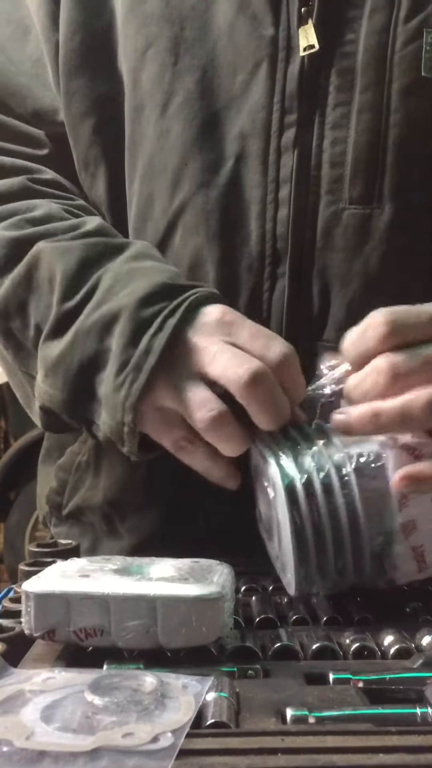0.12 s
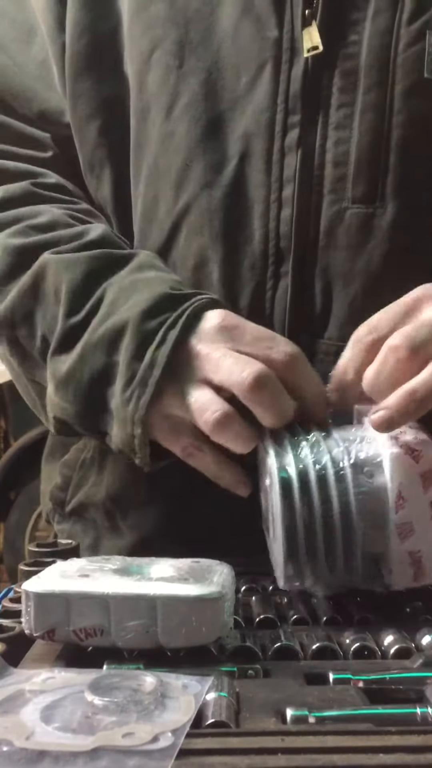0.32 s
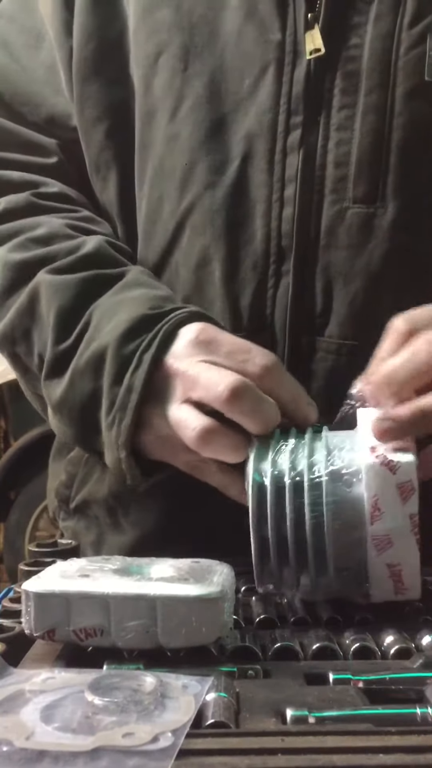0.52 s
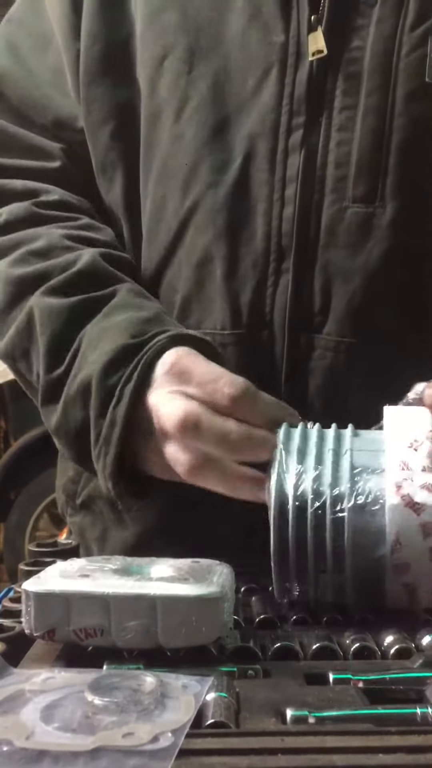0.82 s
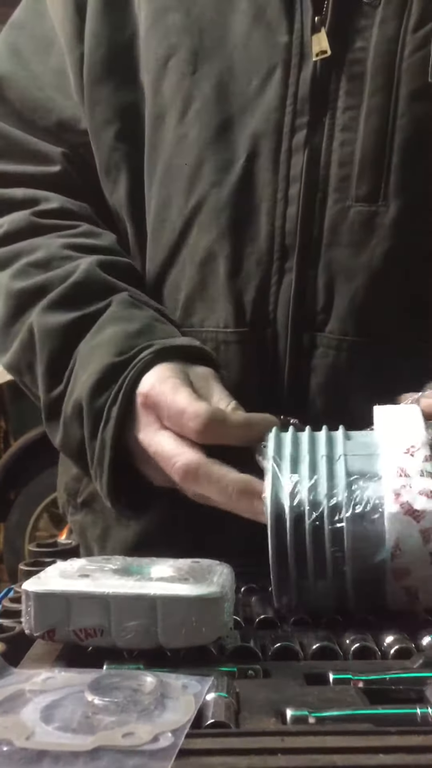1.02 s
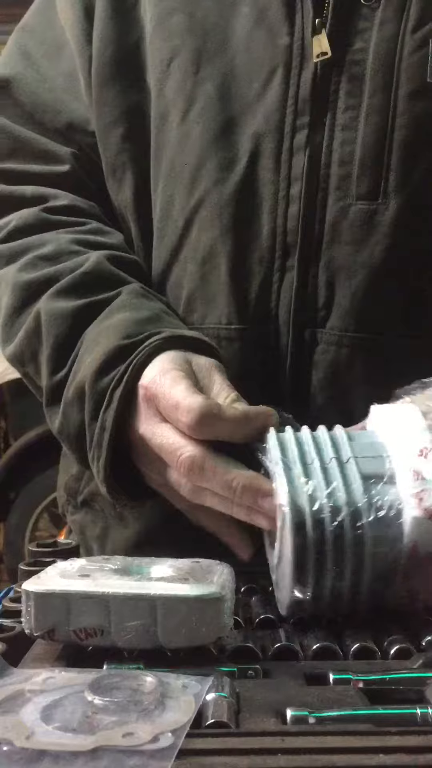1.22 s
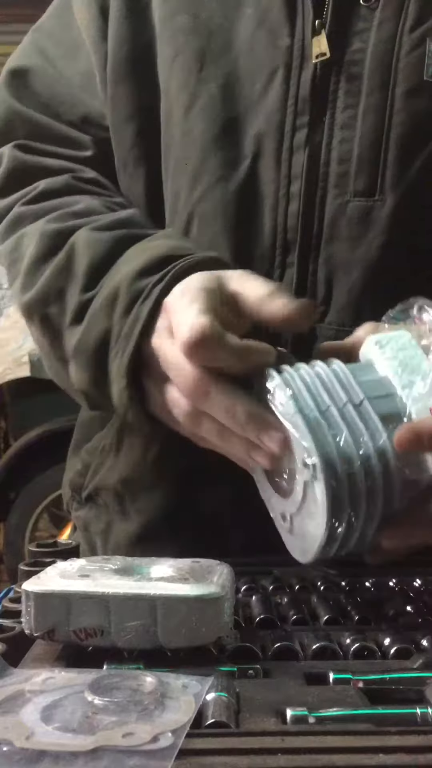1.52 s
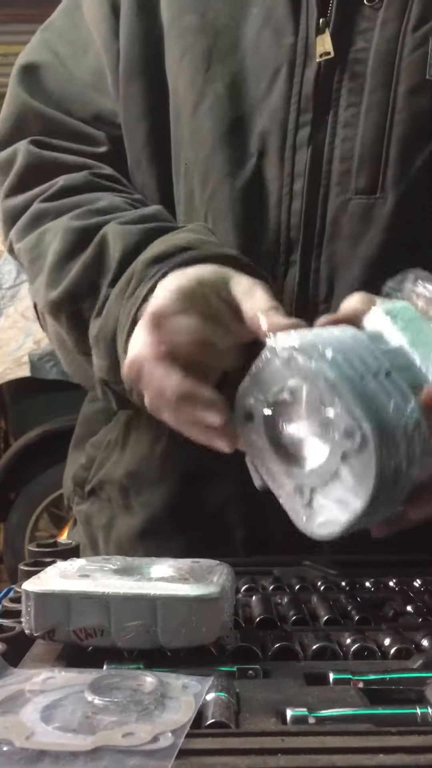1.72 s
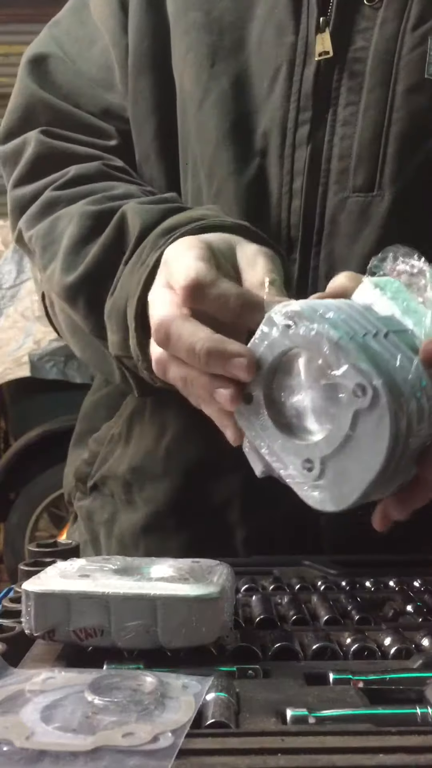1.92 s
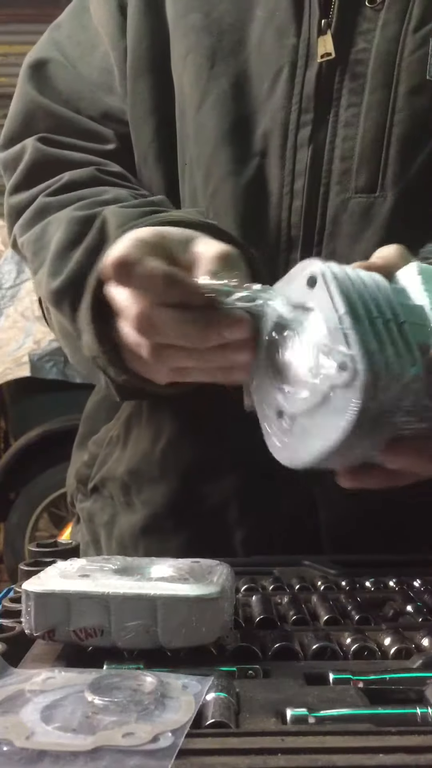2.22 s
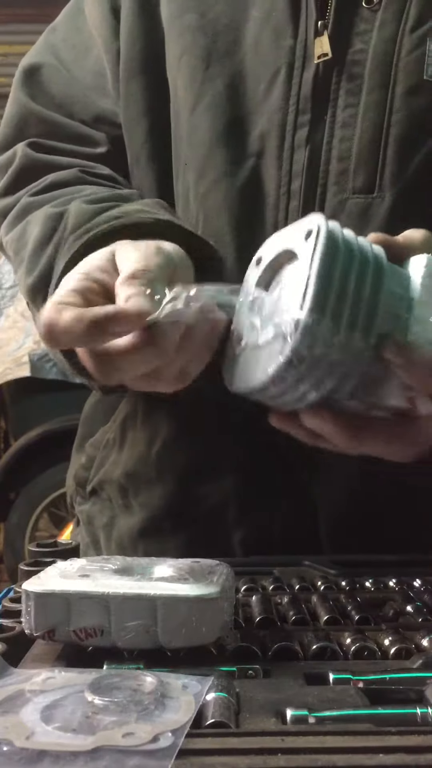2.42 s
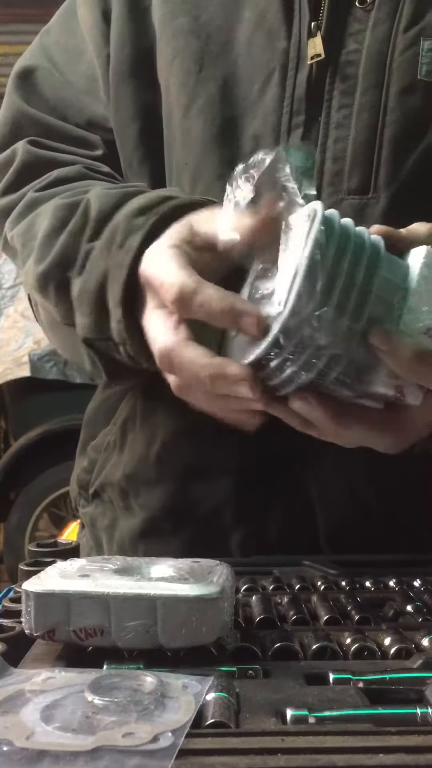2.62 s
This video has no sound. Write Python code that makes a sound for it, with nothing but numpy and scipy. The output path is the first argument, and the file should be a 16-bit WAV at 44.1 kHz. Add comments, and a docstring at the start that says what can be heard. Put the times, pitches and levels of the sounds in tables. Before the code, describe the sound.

Thin plastic wrap crackles and rustles close to the microphone as hands peel it from a metal part; sharp snaps come early, dull knocks hit the bench, then brisk crinkling follows over faint hum.

```python
"""Peeling plastic wrap off a finned metal part

Hands peel clear plastic wrap off a finned metal part at a workbench, close to the microphone.
The film snaps (noise bursts and short tones) and rustles (many tiny ringing creases over hiss), and
this makes the metal fins ring a little. Four dull knocks shake the bench with noise and fading tones.
A sleeve swishes as the hand pulls away, fingers rub softly, and a faint hum fills the small workshop."""
import sys
import numpy as np
from scipy import signal
from scipy.fft import rfft, irfft, next_fast_len
from scipy.io import wavfile
from scipy.ndimage import map_coordinates

SR = 44100
rng = np.random.default_rng(int(sys.argv[2]) if len(sys.argv) > 2 else 0)


def unload_audio(sound):
    """Save the sound as a 16-bit wav file, at the path given as the first command line argument."""
    columns = np.transpose(np.atleast_2d(sound))
    # keep every value between -1 and 1, then stretch to whole-number steps
    steps = np.round(np.clip(columns, -1, 1) * 32767)
    wavfile.write(sys.argv[1], SR, steps.astype(np.int16))


N = 123480  # length in samples
TOP_HZ = 16300  # highest pitch that the recorder keeps

# Colour of the crackling film. Each row: frequency in Hz, relative level in dB.
FILM_COLOUR = [(100, -54), (600, -26.5), (1800, -2.5), (2500, -6.5), (3400, 2), (4700, 0.5), (6500, 0),
               (9000, -2.5), (12000, -6), (16000, -10)]
# Colour of the hollow wrap between the hands. Each row: frequency in Hz, relative level in dB.
WRAP_COLOUR = [(80, -33.5), (220, -11.5), (350, -7), (520, -15.5), (720, -9.5), (950, 4), (1170, 0.5),
               (1380, 4), (1750, -10.5), (2500, -13), (4000, -35.5), (12000, -61)]


def amp(db):
    """Turn decibels into a gain."""
    return 10 ** (np.asarray(db) / 20)


def unit(x):
    """Scale a sound to an rms (average strength) of 1."""
    return x / np.sqrt(np.mean(x ** 2) + 1e-20)


def along(points, hz):
    """Read a curve of (Hz, value) points on a logarithmic frequency axis."""
    f, v = np.transpose(points)
    return np.interp(np.log(hz + 1), np.log(f + 1), v)


def level(points):
    """Turn (seconds, dB) points into a gain for every sample."""
    return amp(np.interp(np.arange(N) / SR, *np.transpose(points)))


def wobble(rate):
    """Draw a smooth random curve through `rate` random points a second."""
    points = rng.standard_normal(N // 8)
    return map_coordinates(points, [np.arange(N) * rate / SR], mode="wrap")


def colour(x, points):
    """Filter a sound with the given spectrum, without ringing ahead of time (minimum phase)."""
    size = 8192
    log_gain = np.log(amp(along(points, np.fft.rfftfreq(size, 1 / SR))))
    cepstrum = irfft(log_gain)
    # Folding the second half onto the first makes the filter answer at once.
    cepstrum[1:size // 2] *= 2
    cepstrum[size // 2 + 1:] = 0
    response = irfft(np.exp(rfft(cepstrum)))
    return signal.fftconvolve(x, response / np.linalg.norm(response))[:len(x)]


def noise(points):
    """Make coloured noise of rms 1, as long as the scene."""
    return unit(colour(rng.standard_normal(N), points))


def add(track, s, sound):
    """Mix a sound into the track at time s in seconds."""
    part = track[max(0, round(s * SR)):][:len(sound)]
    part += sound[:len(part)]


def burst(envelope, points, vary_db):
    """Make a noise burst of unit energy, its colour varied at random each time."""
    hz = np.geomspace(100, 16000, 48)
    own_db = along(points, hz) + vary_db * rng.standard_normal(len(hz))
    x = colour(envelope * rng.standard_normal(len(envelope)), np.c_[hz, own_db])
    return x / np.linalg.norm(x)


def snaps():
    """A crease creaks, flips with a crack, rings at its own pitch and thumps the hollow wrap."""
    # Single creases snapping. Each row: start in seconds, relative crack level in dB,
    # relative hollow body level in dB, pitch of the crease in Hz, its ring against the crack in dB.
    snap_rows = [(0.16, -27, -35.5, 5100, -1), (0.2386, -20, -24.5, 3150, -16),
                 (0.2847, -16.5, -22.5, 3580, 4.5), (0.335, -17, -32.5, 5400, -7),
                 (0.3448, -23, -47, 3400, -17), (0.407, -21, -63, 4960, -7),
                 (0.417, -24.5, -37.5, 4460, -4), (0.4456, -15.5, -31, 2900, -5),
                 (0.5441, -15.5, -37, 5900, -11), (0.5484, -17.5, -53, 3270, -3),
                 (0.5619, -14, -26.5, 6700, -2), (0.5749, -21, -30, 4380, -23),
                 (0.5914, -11, -24.5, 3610, -6.5), (0.5974, -23.5, -35, 6970, 3),
                 (0.618, -31, -38.5, 5450, 1), (0.7129, 1.5, -14.5, 3340, -1.5),
                 (0.7172, -20, -27, 3490, 6), (0.7398, -5.5, -16, 4100, -13), (0.7544, -18, -45, 6560, 3),
                 (0.76, -12, -35, 3780, -5), (0.7737, -10.5, -33, 6890, -5),
                 (0.779, -11.5, -15.5, 7150, 1.5), (0.7811, -5.5, -23, 6200, -4),
                 (0.8107, -10.5, -21.5, 4350, -4), (0.8659, -25.5, -55, 11440, -2),
                 (0.924, -19.5, -37.5, 4440, -2), (0.9307, -19, -34, 3800, -23),
                 (0.9683, -19, -37, 6700, -2), (0.9754, -18.5, -23.5, 3000, -20),
                 (1.0578, -21.5, -40, 4460, -12), (1.0877, -24, -32, 3040, -4),
                 (1.0984, -24, -31.5, 3120, 1), (1.1193, -16, -35, 7360, -1), (1.127, -21, -44, 6590, 4),
                 (1.1578, -14.5, -35, 5560, -9), (1.177, -18, -36, 3000, -7),
                 (1.1817, -12.5, -36.5, 5760, -1), (1.1944, -22.5, -46, 5700, 3),
                 (1.2304, -29, -47, 4270, -3), (1.292, -25, -40, 3950, -18),
                 (1.314, -20.5, -36.5, 4360, -10), (1.3281, -22.5, -41, 6800, 2),
                 (1.3465, -15, -34, 3640, 3), (1.4167, -20, -56, 5230, -16), (1.5685, -27, -68, 5760, 0),
                 (1.5861, -23, -35, 9000, -7), (1.6115, -20, -62, 3650, -1),
                 (1.6796, -23.5, -54, 3920, 2.5), (1.8118, -23.5, -63, 4060, -2.5),
                 (1.8297, -45, -68, 5000, 16), (1.8564, -33.5, -42.5, 3520, 9.5),
                 (1.9136, -16.5, -40, 3430, -11), (1.9394, -30.5, -69, 3960, -2),
                 (1.9994, -25.5, -49, 3520, -13), (2.0909, -25.5, -40, 3540, -14),
                 (2.1079, -15.5, -66, 3400, -14), (2.138, -8.5, -28.5, 6450, -4),
                 (2.1583, -14.5, -42, 4300, -12), (2.1814, -19, -37, 3380, 3), (2.2972, -20, -38, 4200, -5),
                 (2.3291, -18.5, -31, 3220, -1), (2.3644, -13.5, -36.5, 3530, -23),
                 (2.3735, -12, -42, 3180, -6.5), (2.4088, -14, -33, 4060, 0), (2.4204, -16, -35, 3760, -15),
                 (2.4793, -28, -55, 3540, -20), (2.496, -29.5, -48, 9000, 7),
                 (2.5263, -25.5, -36.5, 9340, 2.5), (2.6709, -26.5, -41.5, 3720, -13),
                 (2.717, -19.5, -40.5, 5670, -3), (2.7258, -19.5, -67, 3500, -3),
                 (2.749, -18.5, -60, 3500, -19), (2.7599, -18, -44, 3500, -5)]
    crack_gain_db, crack_rise_s = 6, 0.00049  # rise time of a crack whose row says 0 dB
    weak_slower = 0.38  # weak creases flip more slowly: dB of duration per dB of strength
    flutter_db, flutter_s = -5, 0.006  # the flutter after the crack: level, fading time
    crease_gain_db, crease_s = 5.5, 0.0012  # ring of a crease: level, fading time
    crease_blur = 0.26  # random phase step per sample in radians
    body_gain_db, body_rise_s = 19.5, 0.0009  # the wrap's answer
    lead_db, lead_s = -5, 0.0015  # creak just before the crease gives way: level, swell time

    out = np.zeros(N)
    t = np.arange(SR // 20) / SR
    for s, crack_db, body_db, hz, ring_db in snap_rows:
        u = t / (crack_rise_s * amp(-weak_slower * crack_db))
        growth = 1 - np.exp(-u)
        flip = u * np.exp(1 - u)
        flutter = amp(flutter_db) * growth * np.exp(-t / flutter_s)
        crack = burst(flip + flutter, FILM_COLOUR, vary_db=4.5)

        blur = crease_blur * np.cumsum(rng.standard_normal(len(t)))
        ring = growth * np.exp(-t / crease_s) * np.sin(2 * np.pi * hz * t + blur)
        ring /= np.linalg.norm(ring)
        body = burst(t / body_rise_s * np.exp(-t / body_rise_s), WRAP_COLOUR, vary_db=1.2)

        flip_sound = amp(crack_gain_db) * crack + amp(crease_gain_db + ring_db) * ring
        add(out, s, amp(crack_db) * flip_sound)
        add(out, s, amp(body_db + body_gain_db) * body)

        # Played backwards, the fading burst swells up to the snap.
        lead = amp(crack_db + lead_db) * burst(np.exp(-t / lead_s), FILM_COLOUR, vary_db=1.5)
        add(out, s - len(t) / SR, lead[::-1])
    return out


def rustle():
    """Clumps of tiny creases, each with its own pitch, over the hiss of film sliding on film."""
    # How hard the film is worked. Each row: time in seconds, crackle level in dB,
    # hollow body level in dB, both ahead of the clumping and the mix of creases and hiss.
    effort = [(0, -62, -53.5), (0.118, -62.5, -58.5), (0.163, -44, -44), (.24, -44.5, -40),
              (.31, -53.5, -55.5), (.42, -52, -47), (.47, -46.5, -40), (0.526, -57, -61), (.55, -47, -42.5),
              (.585, -38.5, -35.5), (.63, -52.5, -57), (0.666, -52.5, -41.5), (.70, -47, -55.5),
              (.775, -47, -40), (.84, -47.5, -47), (0.898, -54.5, -55), (0.942, -43, -44.5),
              (1.02, -47, -41.5), (1.125, -42.5, -41), (1.17, -58, -49), (1.215, -60, -58),
              (1.33, -51, -43.5), (1.48, -42.5, -47), (1.55, -54, -55), (1.61, -42.5, -48.5),
              (1.66, -55, -58.5), (1.79, -54, -56), (1.87, -56.5, -53), (1.97, -58, -63),
              (2.07, -58.5, -68), (2.14, -40.5, -41.5), (2.19, -37, -47), (2.225, -48, -52.5),
              (2.261, -42, -43.5), (2.36, -36.5, -48), (2.418, -49.5, -43), (2.45, -53, -71),
              (2.54, -51, -47.5), (2.655, -64, -65), (2.685, -49, -51.5), (2.765, -39, -52.5),
              (2.8, -54, -54)]
    crinkles_per_s = 1600
    spread_db, size_cap = 7, 2.2  # spread of crease strengths, and a cap on the random size
    middle_hz, octaves, cycles = 5720, 1.475, 2.5  # crease pitch, its range each way, fading time
    slide_db = -2.5  # sliding hiss against the tiny creases
    clump_db, clumps_per_s = 2, 90

    crinkles = np.zeros(N)
    t = np.arange(SR // 150) / SR
    slide = amp(slide_db) * rng.standard_normal(N)
    for when, size, pitch in rng.random((int(crinkles_per_s * N / SR), 3)):
        hz = min(middle_hz * 2 ** (octaves * (2 * pitch - 1)), TOP_HZ - 1000)
        size_db = spread_db * min(-np.log(1 - size), size_cap)
        tone = np.exp(-t * hz / cycles) * np.sin(2 * np.pi * hz * t)
        add(crinkles, when * N / SR, amp(size_db) * hz * tone)

    def through(points):
        """Colour creases and hiss alike and mix them to rms 1."""
        return unit(unit(colour(crinkles, points)) + colour(slide, points))

    s, crackle_db, body_db = np.transpose(effort)
    clumps = unit(amp(clump_db * wobble(clumps_per_s)))
    crackle = level(np.c_[s, crackle_db]) * through(FILM_COLOUR)
    body = level(np.c_[s, body_db]) * through(WRAP_COLOUR)
    return clumps * (crackle + body)


def fins(film):
    """The metal fins ring briefly with the film, damped by the hands."""
    # Ring of the cooling fins. Each row: pitch in Hz, relative level in dB.
    fin_tones = [(2381, -3), (2599, 5), (3138, -15), (3330, -10.5), (3473, -3.5), (3663, 4.5), (4068, -13),
                 (4385, -1)]
    # The fins ring more freely once the part is lifted.
    # Each row: time in seconds, level of the film's push on the fins in dB.
    fin_freedom = [(0, -19.5), (1.4, -20.5), (1.8, -12), (2.8, -13)]
    t60_s = 0.04  # time to fade by 60 dB

    t = np.arange(SR // 8) / SR
    ring = sum(amp(db - 60 * t / t60_s) * np.sin(2 * np.pi * hz * t) for hz, db in fin_tones)
    return signal.fftconvolve(level(fin_freedom) * film, ring / np.linalg.norm(ring))[:N]


def knocks():
    """A dull contact and short rattle, a sagging thud, then the bench booms and rings."""
    # Dull knocks on the bench. Each row: start in seconds, contact level in dB,
    # level of thud, boom and ring together in dB (relative), starting pitch of the thud in Hz.
    knock_rows = [(0.2121, -18.5, -25.5, 275.3), (0.4519, -15, -23, 263.3), (.997, -22, -27, 268),
                  (1.3563, -20.5, -25, 306.7)]
    # Colour of the contact. Each row: frequency in Hz, relative level in dB.
    contact_colour = [(100, -8.5), (500, -9), (800, -7), (1050, 3.5), (1400, 0), (2000, -6.5), (2500, -11),
                      (3200, -7), (4500, -21.5), (8000, -27.5), (16000, -37)]
    # Colour of the boom. Each row: frequency in Hz, relative level in dB.
    boom_colour = [(25, -44), (55, 6), (90, 3.5), (150, 0), (260, 1.5), (380, -7), (550, -11.5), (900, -14),
                   (3000, -28), (9000, -66)]
    # Tones of the bench. Each row: pitch in Hz, relative level in dB,
    # time to fade by 60 dB in seconds, build-up time in seconds.
    bench_tones = [(71.5, -4, 0.26, 0.03), (140.2, -11, 0.42, 0.018), (195, -1.5, 0.096, 0.011),
                   (359.3, -9.5, 0.16, 0.0019), (970, -26, 0.037, 0.00055), (1395, -2, 0.14, 0.0081),
                   (1427, -5.5, 0.29, 0.022)]
    contact_s, rattle_db, rattle_s = 0.0051, -19.5, 0.045  # fading times, rattle against contact
    boom_rise_s, boom_s = 0.006, 0.034  # rise and fading time
    thud_db, thud_s = 6, 0.015  # level, fading time
    thud_sag_per_s = 2.54  # rate at which the thud's pitch falls, as a share of itself per second

    out = np.zeros(N)
    t = np.arange(SR // 2) / SR
    rise = 1 - np.exp(-t / boom_rise_s)
    for s, contact_db, boom_db, thud_hz in knock_rows:
        strike = np.exp(-t / contact_s) + amp(rattle_db) * np.exp(-t / rattle_s)
        contact = np.linalg.norm(strike) * burst(strike, contact_colour, vary_db=0.5)
        boom = noise(boom_colour)[:len(t)] * rise * np.exp(-t / boom_s)

        thud_cycles = thud_hz * np.cumsum(np.exp(-thud_sag_per_s * t)) / SR
        thud = amp(thud_db) * rise * np.exp(-t / thud_s) * np.sin(2 * np.pi * thud_cycles)

        ring = np.zeros(len(t))
        for hz, db, t60_s, build_s in bench_tones:
            swell = amp(db - 60 * t / t60_s) * (1 - np.exp(-t / build_s))
            ring += swell * np.sin(2 * np.pi * (hz * t + rng.random()))
        add(out, s, amp(contact_db) * contact + amp(boom_db) * (thud + boom + ring))
    return out


def handling():
    """Cloth and skin rub as coloured noise: the sleeve swishes once, fingers rub softly on the wrap."""
    # Colour of the sleeve. Each row: frequency in Hz, relative level in dB.
    sleeve_colour = [(60, -37), (210, -1), (300, -0.5), (480, 0), (650, -5.5), (900, 3), (1300, -9.5),
                     (2300, -11.5), (3300, -25), (8000, -45)]
    # Soft rubs of the fingers. Each row: start in seconds, length in seconds, peak gain in dB.
    finger_rubs = [(.01, 0.012, -49), (0.06, 0.042, -53), (0.877, 0.038, -42.5), (1.234, 0.055, -44),
                   (1.463, 0.037, -44)]
    # Colour of the fingers on the wrap. Each row: frequency in Hz, relative level in dB.
    finger_colour = [(300, -21), (1000, -2), (1600, -7), (2350, -3), (3100, -4.5), (4200, -18),
                     (12000, -27)]
    swish_at_s, swish_db, swish_rise_s, swish_fall_s = 2.487, -31.5, 0.0098, 0.065

    t = np.maximum(np.arange(N) / SR - swish_at_s, 0)
    swish = amp(swish_db) * (1 - np.exp(-t / swish_rise_s)) * np.exp(-t / swish_fall_s)
    pressure = np.zeros(N)
    for s, length_s, db in finger_rubs:
        hump = np.abs(np.hanning(int(length_s * SR))) ** 0.5
        add(pressure, s, amp(db) * hump)
    return swish * noise(sleeve_colour) + pressure * noise(finger_colour)


def room(x):
    """The workshop's short tail: fading noise, treble dying first, starting 1/300 s late."""
    # How long the room rings. Each row: frequency in Hz, time to fade by 60 dB in seconds.
    fade_times = [(100, 0.9), (1000, 0.13), (4000, 0.11), (15000, 0.067)]
    hz, t, z = signal.stft(rng.standard_normal(SR // 2), SR, nperseg=256)
    fading = z * amp(-60 * t / along(fade_times, hz)[:, None])
    tail = signal.istft(fading, SR, nperseg=256)[1]
    delayed = np.pad(tail / np.linalg.norm(tail), (SR // 300, 0))
    return signal.fftconvolve(x, delayed)[:N]


def background():
    """Steady tones make the electric hum, a wavering tone the low drone, and noise the room air."""
    # Electric hum. Each row: pitch in Hz, rms level in dB.
    hum_tones = [(119.3, -55), (237.5, -75.5), (356, -74)]
    # Level of the low drone. Each row: time in seconds, level in dB ahead of its wavering.
    drone_level = [(0, -47), (.8, -50), (1.5, -56), (1.9, -68), (2.8, -61)]
    # Colour of the room air. Each row: frequency in Hz, relative level in dB.
    air_colour = [(20, -44), (40, 0), (60, 6), (110, 6.5), (180, -2), (300, -0.5), (550, -16.5),
                  (1000, -20.5), (2000, -9.5), (5000, -37.5), (16000, -81)]
    drone_hz, drone_waver_db, air_db = 67.3, 3.5, -55

    t = np.arange(N) / SR
    hum = np.zeros(N)
    for hz, db in hum_tones:
        hum += amp(db) * np.sqrt(2) * np.sin(2 * np.pi * hz * t + 0.3 * wobble(3.28))
    drone_tone = np.sin(2 * np.pi * drone_hz * t + 1.7 * wobble(6.34))
    drone = unit(amp(drone_waver_db * wobble(5.7)) * drone_tone)
    return hum + level(drone_level) * drone + amp(air_db) * noise(air_colour)


def scene():
    """Film, part, bench and hands sound together in the workshop."""
    room_db = -15.5
    film = snaps() + rustle()
    near = film + fins(film) + knocks() + handling()
    return (near + amp(room_db) * room(near) + background())[None]


def record(dry):
    """The recorder sheds the deepest bass and keeps nothing above its band limit."""
    low_cut_hz = 40
    low_cut = signal.butter(2, low_cut_hz, "high", fs=SR, output="sos")
    dry = signal.sosfilt(low_cut, dry)
    size = next_fast_len(N + SR // 2)
    kept = np.fft.rfftfreq(size, 1 / SR) < TOP_HZ
    return irfft(rfft(dry, size) * kept, size)[..., :N]


dry = scene()
out = record(dry)
unload_audio(out)
```